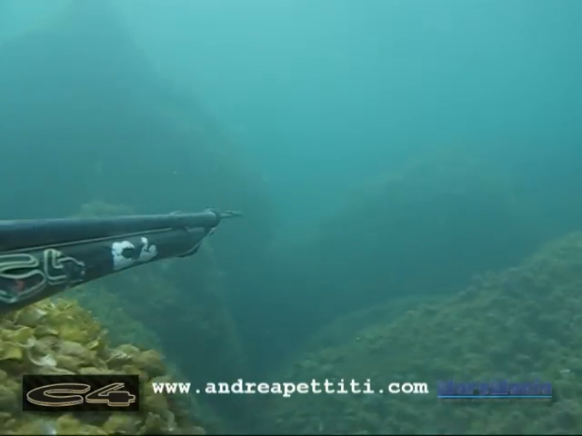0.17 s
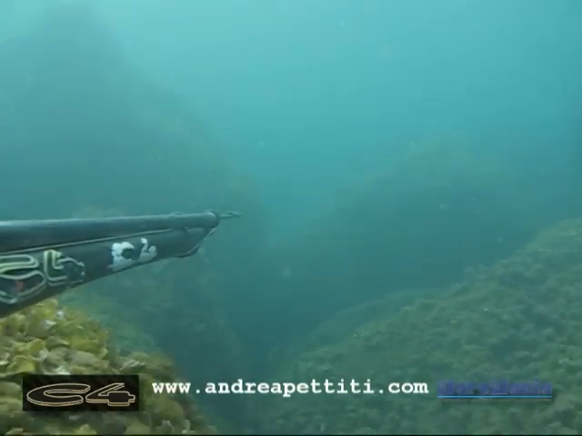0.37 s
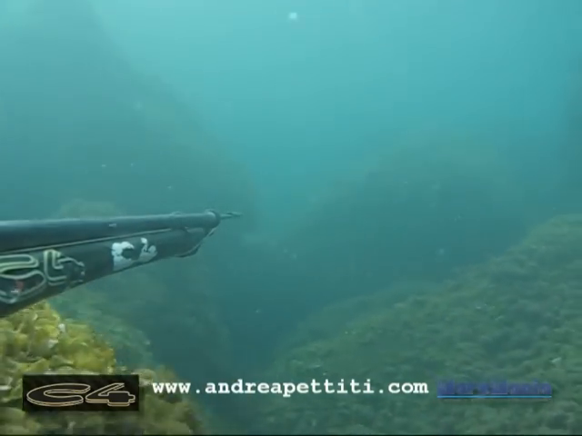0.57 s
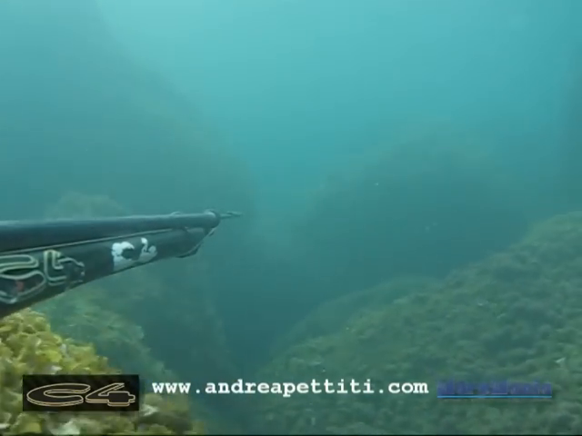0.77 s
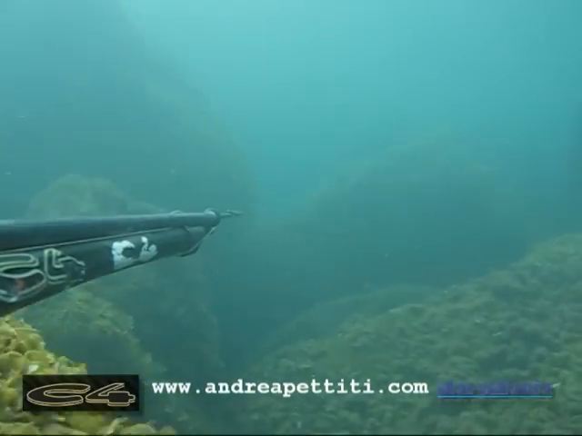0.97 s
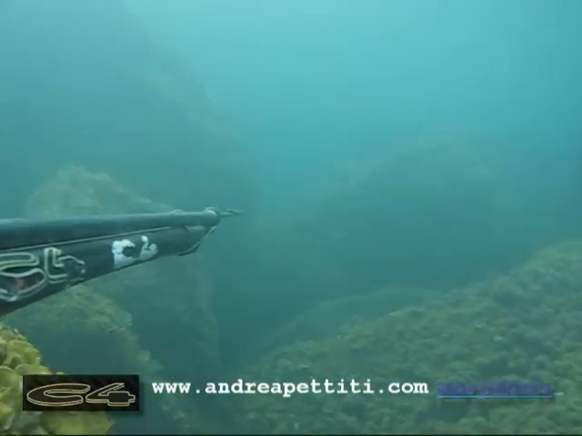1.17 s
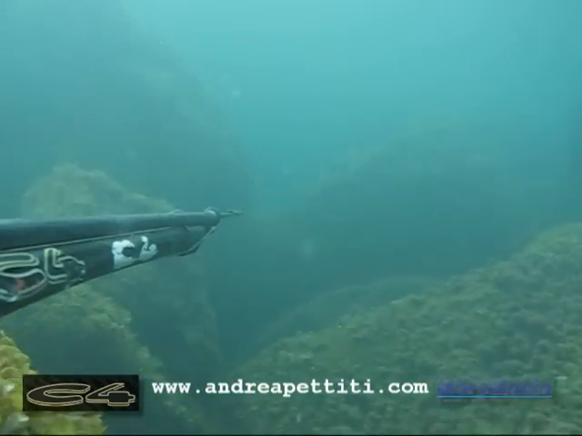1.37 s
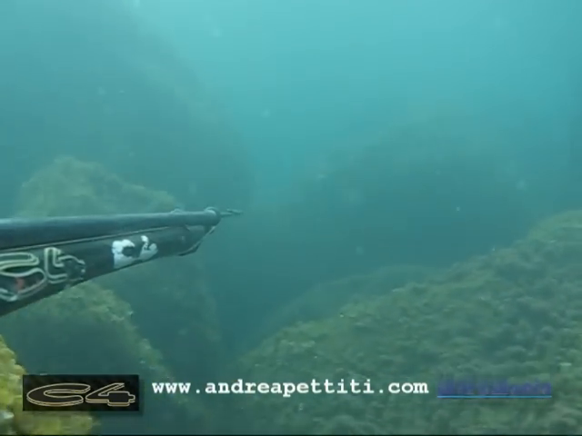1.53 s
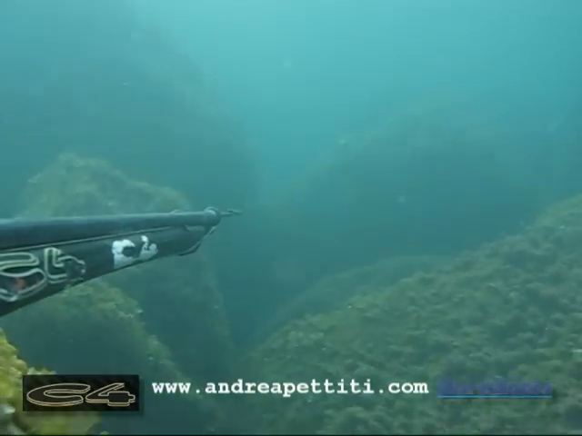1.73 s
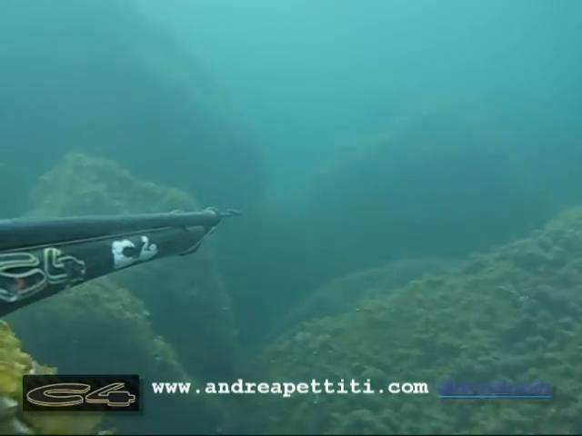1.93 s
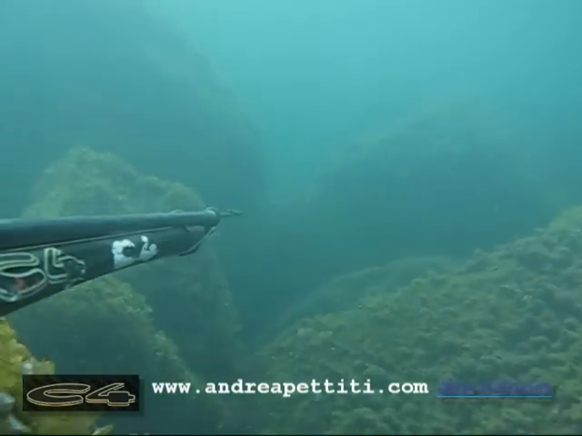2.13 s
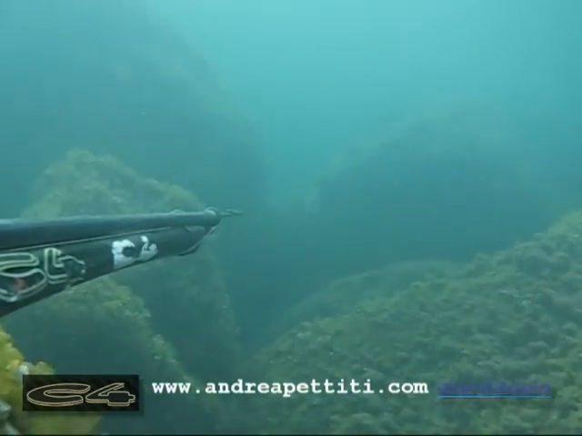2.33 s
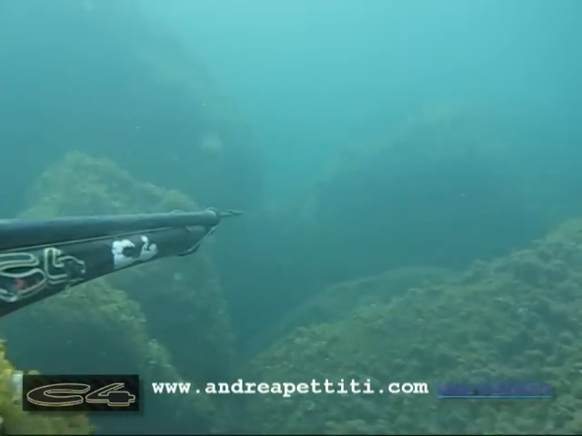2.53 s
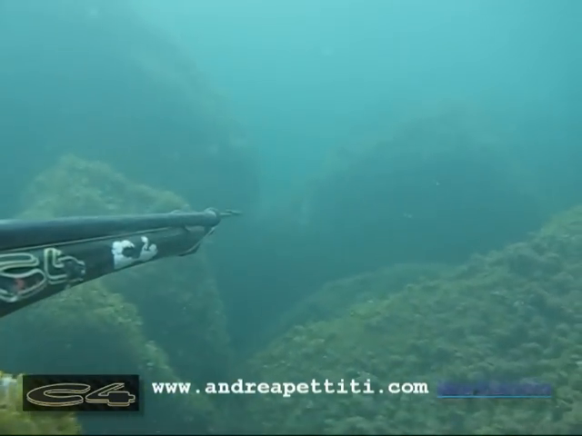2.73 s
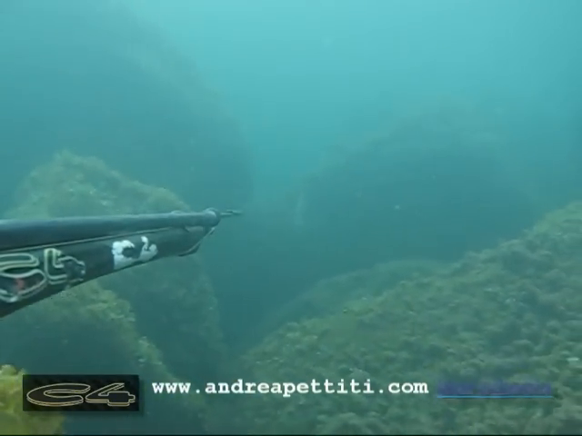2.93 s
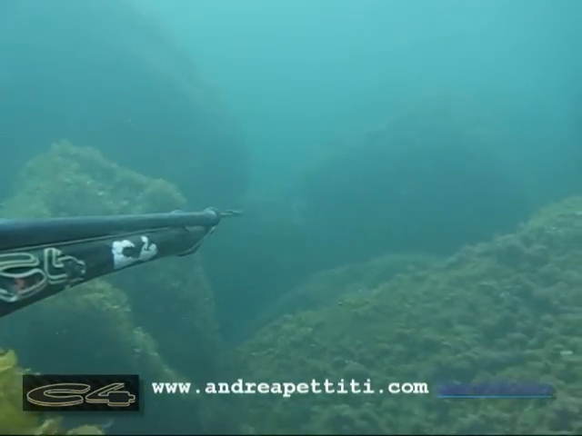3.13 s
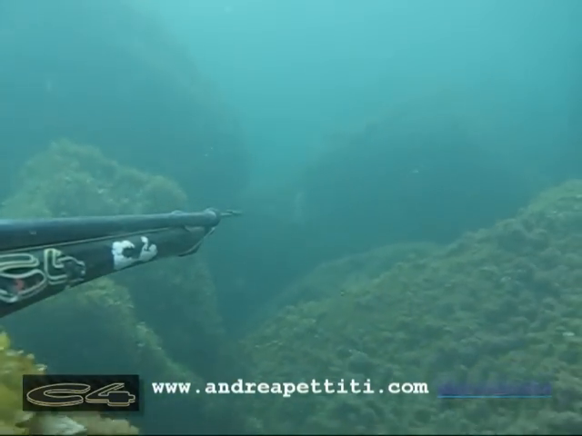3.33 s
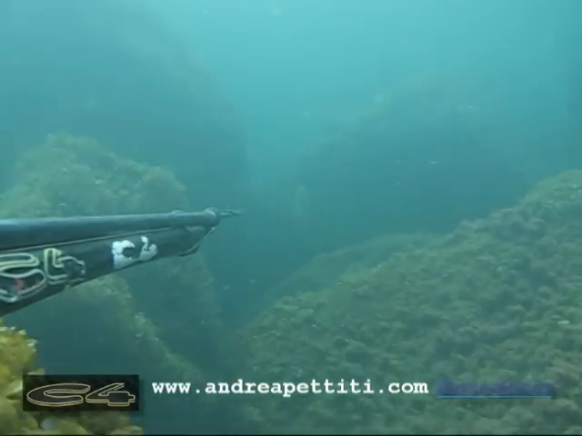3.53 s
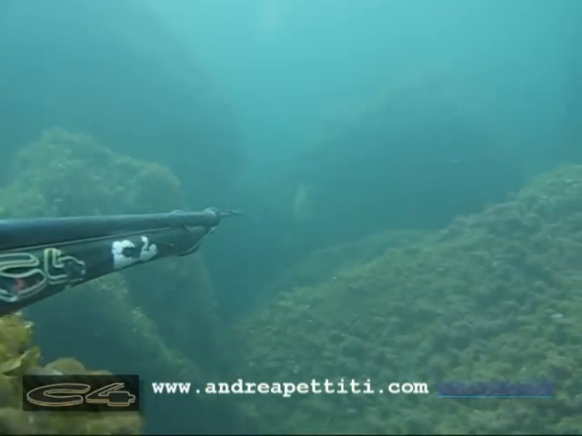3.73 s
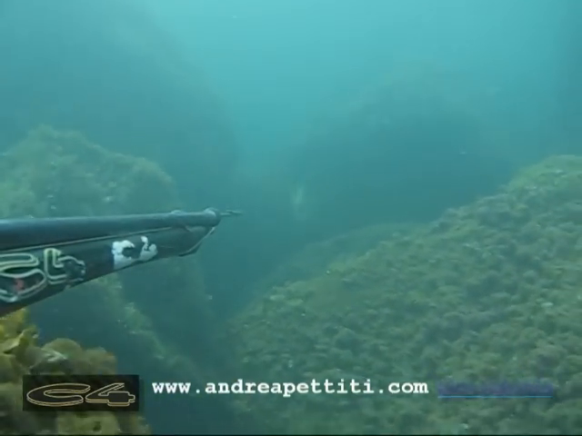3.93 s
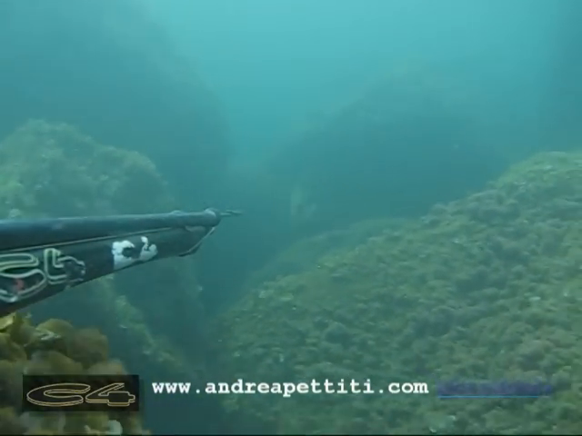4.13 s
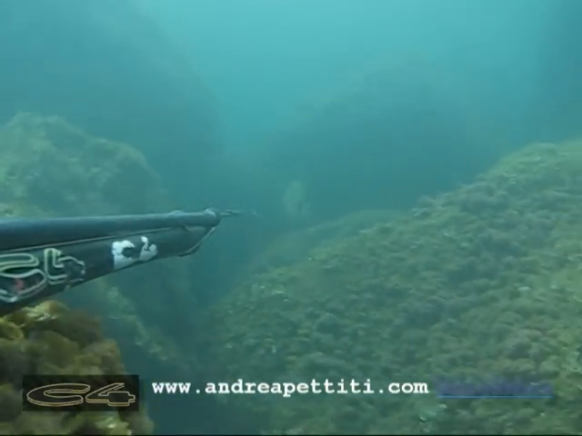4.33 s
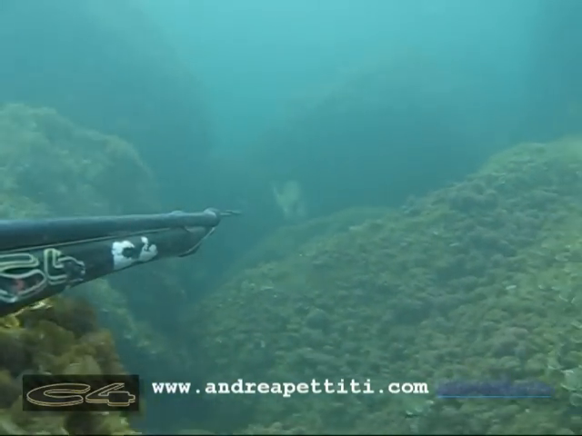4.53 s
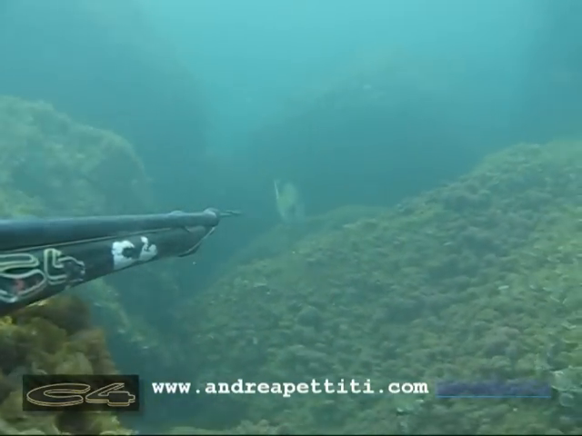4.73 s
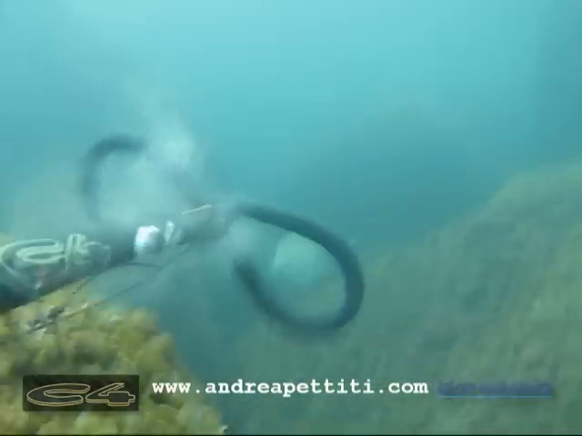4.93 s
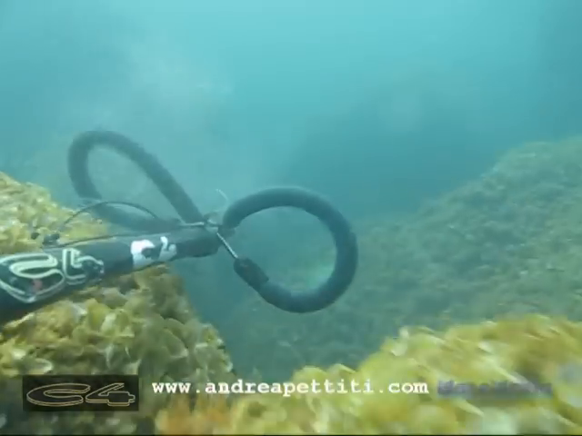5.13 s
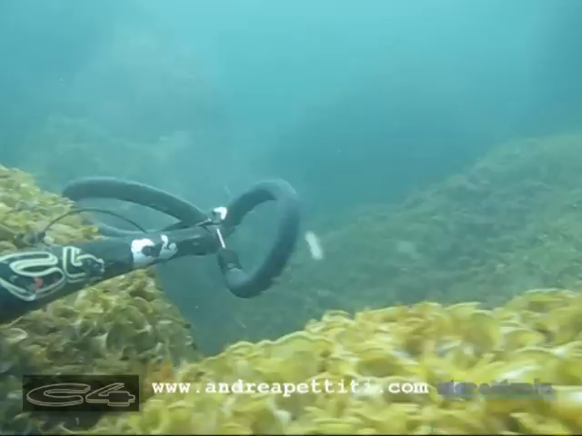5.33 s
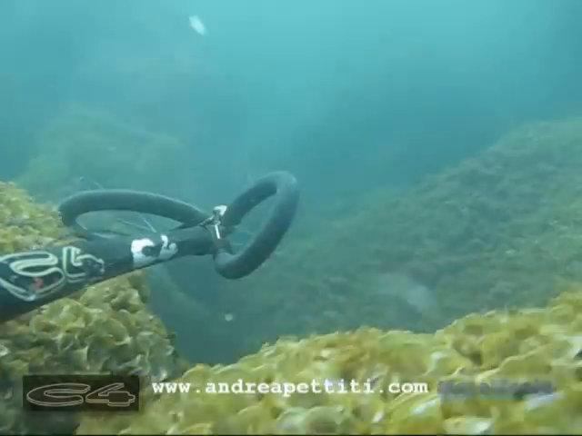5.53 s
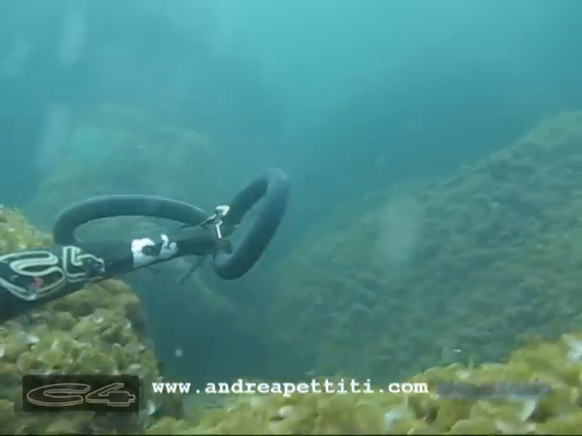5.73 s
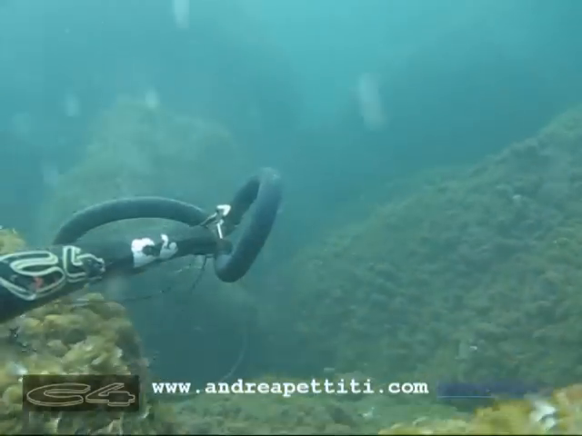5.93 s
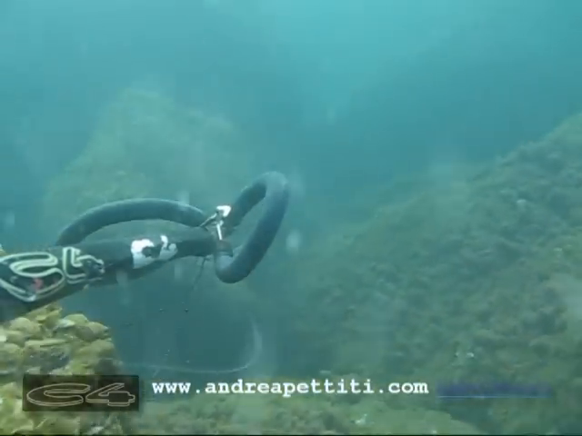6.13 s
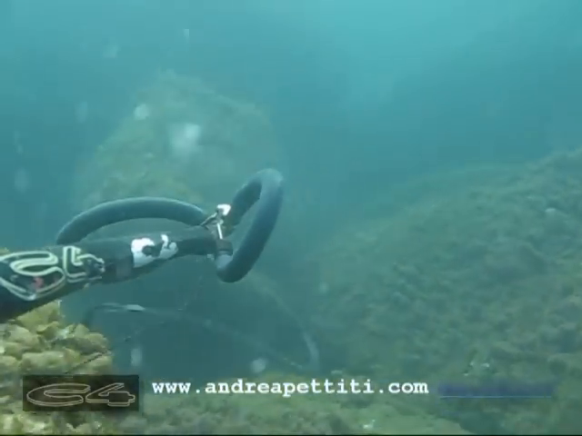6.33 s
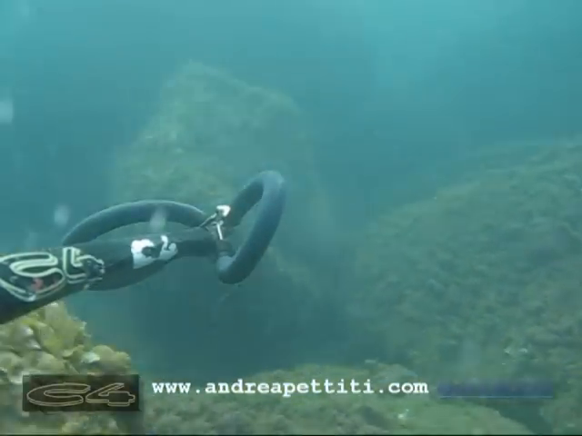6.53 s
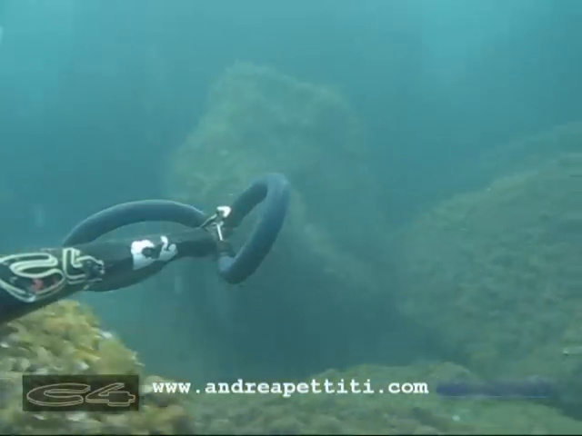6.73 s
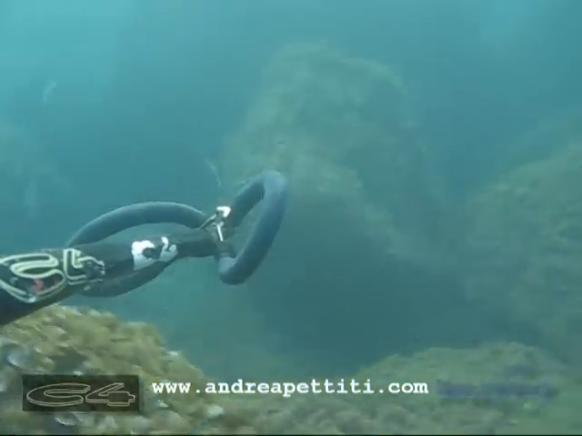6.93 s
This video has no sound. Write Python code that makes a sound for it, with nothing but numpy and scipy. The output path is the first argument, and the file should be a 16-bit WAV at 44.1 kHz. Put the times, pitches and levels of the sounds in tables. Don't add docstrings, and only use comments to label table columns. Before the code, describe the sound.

Underwater among crackling shrimp, a grip taps and groans, then a speargun fires with an overloaded crack, followed by hard knocks, scrapes and rumble.

```python
import sys
import numpy as np
from scipy import signal
from scipy.fft import rfft, irfft
from scipy.io import wavfile
from scipy.ndimage import uniform_filter1d

SR = 44100
rng = np.random.default_rng(int(sys.argv[2]) if len(sys.argv) > 2 else 0)


def persist_wave(psi):
    counts = np.round(np.clip(psi, -1, 1) * 32767).astype(np.int16)
    wavfile.write(sys.argv[1], SR, np.atleast_2d(counts).T)


def decibels_to_gain(level_db):
    exponent = np.asarray(level_db, float) / 20
    return 10 ** exponent


N = 312669

# time in seconds, level in dB.
RUB = [(0.0, -59), (0.41, -55), (1.2, -61), (1.3, -60), (1.83, -58), (2.03, -55), (2.88, -60.5),
       (4.74, -60), (5.03, -56), (5.23, -54.5), (5.35, -47), (5.51, -55.5), (5.73, -51), (6.16, -56.5),
       (6.44, -57), (6.65, -58), (6.79, -43), (7.09, -63)]
# frequency in Hz, width in Hz, level in dB.
HOUSING = [(294, 159, 5.5), (413, 127, 4), (513.2, 27.3, -1.5), (861, 59, -10.5), (1016, 43, -11)]
# start in seconds, peak in dB.
TAPS = [(0.045, -48), (0.093, -39), (0.138, -32.5), (0.194, -33), (0.246, -32), (0.296, -35), (0.34, -37.5),
        (0.389, -36), (0.442, -33), (0.492, -33.5), (0.686, -50), (.735, -41.5), (.783, -44), (.83, -46.5),
        (.882, -42)]


def rms_one(x):
    return x / np.sqrt(np.mean(x ** 2) + 1e-20)


def in_time(rows):
    s, *columns = np.transpose(rows)
    return [np.interp(np.arange(N) / SR, s, c) for c in columns]


def colour(x, points):
    hz = np.maximum(np.arange(513) * SR / 1024, 20)
    point_hz, point_db = np.transpose(points)
    gain = decibels_to_gain(np.interp(np.log(hz), np.log(point_hz), point_db))
    cep = irfft(np.log(gain + 1e-5))
    cep[1:512] *= 2
    cep[513:] = 0
    return signal.fftconvolve(x, irfft(np.exp(rfft(cep))))[:len(x)]


def band(x, lo_hz, hi_hz):
    return signal.sosfilt(signal.butter(2, [lo_hz, hi_hz], "band", fs=SR, output="sos"), x)


def resonance(x, hz, width_hz):
    r = np.exp(-np.pi * width_hz / SR)
    poles = [1, -2 * r * np.cos(2 * np.pi * hz / SR), r * r]
    return signal.lfilter([(1 - r * r) / 2, 0, (r * r - 1) / 2], poles, x)


def ring(hz, t60_s, rise_s, size, glide=0):
    glide_s = 0.021
    t = np.arange(size) / SR
    turns = hz * (t - glide * glide_s * (1 - np.exp(-t / glide_s)))
    return np.sin(2 * np.pi * turns) * decibels_to_gain(-60 * t / t60_s) * (1 - np.exp(-t / rise_s))


def add(out, s, sound):
    i = int(s * SR)
    out[i:i + len(sound)] += sound[:N - i]


def grains(per_s, spread_db):
    size = decibels_to_gain(spread_db * np.minimum(rng.exponential(1, N), 5))
    return (rng.random(N) < per_s / SR) * size * rng.choice([-1, 1], N)


def swells(rows, column=None):
    t, out = np.arange(N) / SR, 0
    for row in rows:
        s, db, rise_s, fall_s = row[:4]
        trim_db = row[column] if column else 0
        away = np.where(t < s, (s - t) / max(rise_s, .005), (t - s) / max(fall_s, .005))
        fade_db = 20 * np.minimum(away + np.maximum(away - 1, 0) ** 2, 9)
        out = out + decibels_to_gain(db + trim_db - fade_db)
    return out


def drift(lo_hz, hi_hz):
    return rms_one(band(rng.standard_normal(N + SR), lo_hz, hi_hz)[SR:])


def gain_db():
    since_s = np.arange(N) / SR - 4.95
    return -10.5 * (since_s > 0) * np.exp(-np.abs(since_s) / 0.36)


def whine():
    # frequency in Hz, level in dB rms.
    tones = [(3403, -62.5), (5814, -83.5), (6654, -92), (6874, -86.5), (7623, -86)]
    t = np.arange(N) / SR
    flutter = 1 + 0.15 * rms_one(band(rng.standard_normal(N), 3.2, 24))
    return flutter * sum(np.sqrt(2) * decibels_to_gain(db) * np.sin(2 * np.pi * hz * t) for hz, db in tones)


def reef():
    # frequency in Hz, level in dB per Hz.
    reef_colour = [(350, -45.5), (600, -7), (1500, -7), (2300, -4.5), (3300, -11), (4300, -10),
                   (5500, -18.5), (7600, -27), (9300, -28)]
    level_db, drift_db, echo_t60_s = -52, 0.57, 0.051
    far = rms_one(grains(2500, spread_db=1.0))
    born, region = grains(70, spread_db=1.35), rng.integers(0, 8, N)
    white = rng.standard_normal(N)
    r = np.exp(-np.log(1000) / (echo_t60_s * SR))
    near = 0
    for k, hz in enumerate(np.geomspace(1200, 7500, 8)):
        puffs = signal.lfilter([1], [1, -r], np.abs(born) * (region == k) + 1e-18)
        near = near + resonance(white * puffs, hz, 0.61 * hz)
    crackle = rms_one(colour(far + 0.68 * rms_one(near), reef_colour))
    return decibels_to_gain(level_db + drift_db * drift(0.75, 2.27)) * crackle


def sway():
    # time in seconds, level in dB.
    sway_curve = [
        [(0.0, -48.5), (0.08, -32.5), (1.62, -39.5), (2.97, -34), (3.15, -48), (3.18, -35), (3.6, -41),
         (4.75, -31.5), (4.8, -22)],
        [(4.97, -26), (6.22, -36), (6.28, -48.5), (6.37, -23.5), (6.5, -50), (6.56, -29.5), (6.67, -38.5),
         (6.94, -22.5), (7.09, -37)],
    ]
    # peak in seconds, level in dB, rise in s, fall in s, boom in dB.
    jolts = [(1.98, -57, 0.041, 0.041, 16), (4.79, -51, 0.033, 0.033, 7), (5.0, -32, 0.12, 0.059, 6.5),
             (5.23, -37, 0.12, .1, 7), (5.36, -37, 0.072, 0.15, 13), (5.52, -36.5, 0.056, 0.11, 8.5),
             (5.68, -44, 0.06, .15, 0), (5.89, -43.5, 0.069, 0.25, 3), (6.18, -45.5, 0.12, 0.14, 3),
             (6.355, -37, 0.07, 0.11, 1), (6.7, -35, 0.085, .12, -15), (6.855, -32, 0.13, 0.16, 3.5)]
    shake_db, lurch_db = -2, 3
    sway_db, rub_db = in_time(sway_curve[0] + sway_curve[1])[0], in_time(RUB)[0]
    t = np.arange(N) / SR
    stunned = decibels_to_gain(-14 * uniform_filter1d(1. * (t > 4.815) * (t < 4.96), size=800))
    boom = rms_one(resonance(resonance(rng.standard_normal(N), 53.6, 13), 53.6, 40))
    white = rng.standard_normal((3, N))
    hz = 20.5 * (1 + 0.149 * np.tanh(rms_one(band(white[0], 0.51, 4.66))))
    shake_gain = np.sqrt(2) * decibels_to_gain(sway_db + shake_db + lurch_db * drift(1.43, 8.2))
    shake = shake_gain * np.sin(2 * np.pi * np.cumsum(hz) / SR)
    thud = rms_one(band(band(white[1], 23.8, 46.3), 22, 56))
    drum = rms_one(band(white[2], 86.0, 116.0))
    thud_db = -43.5 + 0.9 * (sway_db - sway_db.mean())
    drum_db = -61 + 1.1 * (rub_db - rub_db.mean()) + lurch_db * drift(3.4, 6.4)
    drumming = (decibels_to_gain(drum_db) + swells(jolts)) * drum + swells(jolts, column=4) * boom
    return stunned * (shake + decibels_to_gain(thud_db) * thud) + drumming


def rub():
    # peak in seconds, level in dB, rise in s, fall in s, body mode in dB.
    groans = [(1.458, -47, 0.17, 0.19, -7), (1.978, -37.5, 0.14, 0.1, -11), (2.18, -43, 0.027, 0.094, -2),
              (2.3, -46, 0.032, 0.14, -6), (4.2, -50, 0.39, 0.36, -20), (4.68, -51.5, .1, 0.073, 3),
              (4.8, -34, 0.029, 0.025, -3), (5.0, -41, 0.05, 0.03, -8.5), (5.208, -36, 0.033, 0.028, 6.5),
              (5.4, -44, 0.51, 0.087, 4.5), (5.886, -38, 0.14, 0.11, 0), (6.096, -40, 0.09, 0.27, 2),
              (6.3, -33, 0.081, 0.15, -8), (6.62, -40, 0.012, 0.68, -22), (6.865, -36, 0.21, 0.11, 4.5)]
    # peak in seconds, level in dB, rise in s, fall in s.
    scrapes = [
        (5.0, -44.5, 0.074, 0.073),
        (5.898, -42.5, 0.14, 0.075),
        (6.178, -43, 0.19, 0.022),
        (6.3, -30.5, 0.064, 0.076),
        (6.69, -37, 0.11, 0.32),
    ]
    low_db, = in_time(RUB)
    touch = grains(1600, spread_db=3.0) + 0.18 * rng.standard_normal(N)
    modes = []
    for hz, width_hz, db in HOUSING:
        broad_hz = 2.58 * width_hz
        modes.append(decibels_to_gain(db) * rms_one(resonance(resonance(touch, hz, broad_hz), hz, broad_hz)))
    groan = rms_one(resonance(resonance(grains(900, spread_db=1.5), 494, 100), 494, 100))
    body = rms_one(resonance(resonance(grains(600, spread_db=4.5), 290, 150), 290, 150))
    wall_gain = decibels_to_gain(-77 + 0.6 * (low_db - low_db.mean())) + swells(scrapes)
    walls = wall_gain * (modes[3] - modes[4])
    murmur = 0.81 * rms_one(band(touch, 116.5, 258))
    rubbing = decibels_to_gain(low_db) * (murmur + modes[0] - modes[1] + modes[2])
    return rubbing - walls + decibels_to_gain(-6.0) * (swells(groans) * groan + swells(groans, column=4) * body)


def swish():
    # peak in seconds, level in dB, rise in s, fall in s.
    washes = [
        (1.85, -48, 0.074, 0.82),
        (2.06, -45, 0.012, 0.015),
        (5.31, -46, 0.077, 0.12),
        (6.314, -36, 0.078, 0.036),
        (6.6, -45.5, 0.031, 0.36),
        (6.776, -42.5, 0.22, 0.089),
    ]
    fizz = grains(9000, spread_db=2.2)
    wash = rms_one(band(band(fizz, 900, 2940), 700, 4300) + 1.8 * resonance(fizz, 2180, 330))
    return decibels_to_gain(-1.5) * swells(washes) * wash


def hum():
    # peak in seconds, level in dB, rise in s, fall in s.
    line_swell = [
        (5.2, -55, .25, 1.6),
    ]
    return swells(line_swell) * rms_one(resonance(rng.standard_normal(N), 640, 7.0))


def squeaks():
    # start in seconds, length in s, level in dB, frequency in Hz, end pitch ratio.
    stick_slips = [(1.799, 0.25, -51, 1550, 0.91), (1.9, .04, -47.5, 1120, 1.03),
                   (1.92, 0.11, -39.5, 504.4, 0.95), (1.954, 0.04, -37, 417, 1.03),
                   (2.16, 0.063, -38, 544.5, 0.86), (2.285, 0.036, -47, 488, 0.93),
                   (2.191, 0.032, -53, 1047, 1.0), (2.294, 0.033, -56, 1044, 1.06),
                   (4.785, 0.037, -41, 522, 1.0), (4.995, 0.043, -39.5, 500, 1.0),
                   (5.0, 0.038, -45.5, 1019, 0.996), (4.797, 0.035, -33.5, 280, 0.95),
                   (6.079, 0.11, -40.5, 299.7, 1.02), (6.201, 0.11, -41.5, 298, 0.94),
                   (6.28, 0.065, -43, 1055, 1.12), (6.29, 0.06, -38.5, 520, 1),
                   (6.62, 0.045, -40.5, 810, 1.13), (6.66, 0.096, -40.5, 835, .93),
                   (6.62, .14, -48, 2120, 0.99), (6.651, 0.026, -40.5, 1250, 0.91),
                   (6.74, 0.028, -46, 1043, 0.9), (6.77, 0.051, -43, 1000, 0.99),
                   (6.8, 0.091, -39.5, 497.6, 1), (2.0, 0.057, -43, 310.5, 1.02), (2.0, .08, -45, 170, 1.0),
                   (5.622, 0.082, -41, 309.4, 1.02), (6.33, 0.031, -35.5, 500, 1.01),
                   (6.7, 0.11, -41, 522, 1.08), (6.86, 0.051, -38, 509, 0.97),
                   (5.329, 0.023, -42, 1038, 0.95), (1.099, 0.079, -49.5, 401, 0.93)]
    chance = rng.standard_normal((len(stick_slips), 2, 14000))
    out = np.zeros(N)
    for (s, length_s, db, hz, ratio), d in zip(stick_slips, chance):
        u = np.linspace(0, 1, int(length_s * SR))
        wobble, throb = (rms_one(band(v, 19.4, 120))[2000:2000 + len(u)] for v in d)
        tone = np.sin(2 * np.pi * np.cumsum(hz * (ratio ** u + 0.017 * wobble)) / SR)
        add(out, s, decibels_to_gain(db) * np.sin(np.pi * u) ** 0.78 * (1 + 0.37 * throb) * tone)
    return out


def slips():
    from_hz, to_hz, length_s, lead_s, level_db = 2900, 956, 0.012, 0.008, -6.5
    out, u = np.zeros(N), np.linspace(0, 1, int(length_s * SR))
    for (s, db), d in zip(TAPS, rng.standard_normal((len(TAPS), 2000))):
        hz = from_hz * (1 + 0.075 * d[0]) * (to_hz / from_hz) ** u
        fall = np.sin(2 * np.pi * np.cumsum(hz) / SR)
        grit = rms_one(band(d, 54, 840))[-len(u):]
        add(out, s - lead_s, decibels_to_gain(db + level_db) * np.sin(np.pi * u) * (0.36 + grit) * fall)
    return out


def knocks():
    # start in seconds, peak in dB, upper mode in dB, t60 in s.
    hard_hits = [(2.166, -45, -29, 0.11), (4.035, -34.5, -29, 0.033), (4.965, -40.5, 10, 0.055),
                 (4.988, -40, 8, 0.059), (5.036, -17.5, -27, 0.03), (5.081, -49.5, 7, 0.065),
                 (5.162, -32, -3, 0.035), (5.197, -21, -14, 0.032), (5.211, -25, -30, 0.027),
                 (5.291, -27.5, -20.5, 0.038), (5.346, -31, -3, 0.053), (5.464, -22, -22, 0.029),
                 (5.491, -13.5, -10, 0.04), (5.656, -25, -13, 0.043), (5.684, -35, -12, 0.037),
                 (6.043, -34.5, -24, 0.033), (6.587, -31, -15, 0.031)]
    tap_upper_db, tap_t60_s, tap_sharp, grit_db = -21, 0.072, 1.03, -27
    body_hz, _, air_hz, wall_hz, upper_hz = [row[0] for row in HOUSING]
    out, t = np.zeros(N), np.arange(6000) / SR
    hits = [(s, db, tap_upper_db, tap_t60_s, tap_sharp) for s, db in TAPS]
    hits += [(*row, 1) for row in hard_hits]
    for (s, db, upper_db, t60_s, sharp), d in zip(hits, rng.normal(0, 1, (len(hits), 6000))):
        air = ring(sharp * air_hz * (1.04 + 0.019 * d[0]), 1.57 * t60_s, 0.0019, size=6000, glide=0.079)
        air = air * decibels_to_gain(-60 * (t / (1.01 * t60_s)) ** 2)
        air = air + 0.28 * ring(body_hz, 0.042, 0.0014, size=6000)
        air = air - 0.31 * ring(364, 0.023, 0.00061, size=6000)
        wall = ring(upper_hz * (1 + 0.032 * d[1]), 0.065, 0.002, size=6000) * decibels_to_gain(-60 * (t / .04) ** 2)
        wall = wall + 0.68 * ring(wall_hz * (1 + 0.058 * d[2]), 0.038, 0.00039, size=6000)
        grit = band(d * decibels_to_gain(-60 * t / 0.017), 1900, 2700)
        add(out, s, decibels_to_gain(db + 2.5) * (air + decibels_to_gain(upper_db) * (wall + 0.62 * grit) + decibels_to_gain(grit_db) * grit))
    return out


def bumps():
    # start in seconds, peak in dB.
    body_bumps = [(0.213, -30.5), (0.564, -37), (0.6, -37), (0.803, -38.5), (0.96, -44), (1.102, -37),
                  (2.03, -47), (2.573, -33.5), (5.243, -51), (5.354, -53), (6.349, -43)]
    bump_hz, thump_hz = 185.4, 98
    bump = ring(bump_hz, 0.042, 0.00072, size=8000) - 0.54 * ring(0.74 * bump_hz, 0.049, 0.0024, size=8000)
    bump = bump + decibels_to_gain(-4) * ring(thump_hz, 0.11, 0.0031, size=8000)
    out = np.zeros(N)
    for s, db in body_bumps:
        add(out, s, decibels_to_gain(db + 5.5) * bump)
    return out


def snaps(rows, broad, width):
    collapse_s, click_weight, echo_per_s, top_hz = 0.000897, 2.76, 24.4, 5200
    out, t = np.zeros(N), np.arange(3000) / SR
    for (s, db, hz, t60_s), noise in zip(rows, rng.standard_normal((len(rows), 3000))):
        front = decibels_to_gain(-60 * t / 0.0053)
        echo = min(echo_per_s * t60_s, 1) * decibels_to_gain(-60 * t / np.clip(t60_s, .004, .1))
        puff = noise * (front + echo) * (1 - np.exp(-(t / 0.0007) ** 2))
        puff[int(collapse_s * SR)] += click_weight * np.sign(noise[0])
        body = resonance(puff, hz, width * hz) + broad * 0.4 * band(puff, 1240, 3670)
        body = body + 0.1 * band(puff, 600, 1400) + 0.072 * band(puff, 3190, 4240)
        body = band(body, 250, max(top_hz, 1.6 * hz)) + 0.052 * band(puff, 6500, 9000)
        add(out, s, decibels_to_gain(db - 7.0) * body / np.abs(body).max())
    return out


def thin_snaps():
    # start in seconds, peak in dB, centre in Hz, t60 in s.
    thin_rows = [(.105, -28, 2300, 0.076), (.217, -28, 1900, .03), (.36, -33, 2100, .03),
                 (.9953, -24, 3800, 0.022), (1.04, -35, 2200, 0.046), (1.124, -33, 4300, .03),
                 (1.167, -24, 4300, 0.075), (1.24, -31, 2000, 0.047), (1.805, -34.5, 4000, .04),
                 (1.897, -36, 5000, .02), (1.92, -33, 5000, 0.028), (1.959, -27.5, 4270, .05),
                 (2.104, -31.5, 4200, .05), (4.965, -26, 2400, .03), (4.975, -29, 2050, .06),
                 (4.992, -33, 2300, .05), (5.04, -22, 2050, 0.046), (5.081, -33.5, 2300, .04),
                 (5.158, -33, 2200, 0.036), (5.196, -24.5, 2100, 0.024), (5.284, -32, 2080, .05),
                 (5.318, -28, 2600, .05), (5.452, -31, 2600, .03), (5.4895, -22.5, 1340, 0.018),
                 (5.708, -31, 2380, 0.027), (5.73, -32, 2150, 0.043), (5.887, -28.5, 2100, .03),
                 (6.745, -25.5, 2700, 0.053), (6.845, -27, 2300, .03), (5.0362, -16, 630, 0.01),
                 (5.369, -27, 5500, .025), (6.47, -30, 2400, 0.033), (6.495, -32, 2300, .03),
                 (1.45, -37.5, 5500, 0.073)]
    return snaps(thin_rows, broad=0.23, width=0.27)


def near_snaps():
    # start in seconds,
    # peak in dB, centre in Hz, t60 in s.
    snap_rows = [(0.134, -23, 2060, 0.038), (0.2594, -9.5, 2170, 0.027), (0.5186, -15.5, 2160, 0.069),
                 (0.6352, -25, 2560, 0.064), (0.7205, -19, 2000, 0.028), (0.7713, -20, 1920, 0.02),
                 (0.9012, -25, 1890, 0.027), (0.936, -17, 2670, 0.037), (0.9955, -19, 2320, 0.022),
                 (1.1656, -21.5, 2090, 0.07), (1.518, -15.5, 2200, 0.03), (1.8518, -20.5, 2410, 0.024),
                 (2.0503, -22.5, 2670, 0.035), (2.1303, -22.5, 2200, 0.029), (2.1938, -26, 3440, 0.11),
                 (2.3988, -24.5, 2380, 0.061), (2.8505, -24.5, 2420, 0.031), (3.0615, -21, 4230, 0.036),
                 (3.4315, -23, 3260, 0.075), (3.4669, -25, 1320, 0.063), (3.602, -27.5, 2350, 0.07),
                 (3.6476, -27.5, 2130, 0.03), (3.7162, -9, 2640, 0.023), (3.7855, -21, 2280, 0.017),
                 (4.0612, -28.5, 3410, 0.035), (4.1503, -24.5, 1870, 0.03), (4.291, -25.5, 2420, 0.053),
                 (4.309, -23, 2150, 0.11), (4.6218, -23.5, 2270, 0.08), (4.797, -29, 2080, 0.062),
                 (4.8458, -22, 2650, 0.015), (4.8614, -22, 1310, 0.013), (4.946, -18, 2440, 0.042),
                 (5.02, -19, 2650, 0.0138), (5.0366, -25.5, 2080, 0.053), (5.1942, -23, 2120, 0.019),
                 (5.343, -29, 2100, 0.026), (5.3681, -15.5, 3400, 0.028), (5.46, -28, 2540, 0.058),
                 (5.5664, -23, 2270, 0.088), (5.904, -18, 2320, 0.054), (5.972, -28, 4140, 0.03),
                 (6.043, -29, 2130, 0.026), (6.0655, -16.5, 2520, 0.035), (6.267, -20, 2090, 0.042),
                 (6.3002, -21.5, 2090, 0.044), (6.3705, -26.5, 1340, 0.033), (6.776, -29, 2160, 0.036),
                 (7.007, -26.5, 2700, 0.088)]
    # start in seconds, peak in dB.
    faint_rows = [(0.192, -32), (0.242, -27), (0.4847, -31), (.509, -20), (0.8408, -27), (1.083, -25),
                  (1.404, -28), (1.506, -26.5), (1.5564, -24.5), (1.75, -32), (2.234, -26), (2.379, -25.5),
                  (2.631, -26), (3.3687, -29), (3.577, -34), (3.666, -25), (4.182, -33), (4.371, -27),
                  (4.594, -31), (4.703, -26.5), (6.2158, -25.5), (6.8473, -30)]
    pitch_db = rng.normal(0, 1.3, len(faint_rows))
    faint = [(s, db, 2300 * decibels_to_gain(u), 0.034) for (s, db), u in zip(faint_rows, pitch_db)]
    return snaps(snap_rows + faint, broad=0.94, width=0.1)


def cracks():
    # start in seconds, peak in dB, frequency in Hz.
    pulses = [(.7223, -26.5, 2100), (.7720, -22, 2300), (.9955, -11, 3800), (.9963, -12, 3200),
              (2.1316, -30, 2600), (2.4001, -32, 2600), (2.4001, -29, 2500), (3.0617, -29, 4600),
              (3.063, -28, 4300), (3.7166, -16, 2300), (3.7173, -10, 2800), (3.7857, -24, 3900),
              (3.7869, -23, 2200), (.2604, -22, 3000), (4.9462, -23, 2600), (4.967, -27, 2200),
              (4.981, -28, 2600), (5.9059, -22, 2500), (6.066, -19, 2700), (6.0675, -22, 2600),
              (4.8214, -14, 2700), (4.8463, -20, 2700), (4.8471, -19, 2900), (4.8623, -17, 2300),
              (4.8694, -12, 800), (4.8783, -20, 2500), (4.8803, -23, 2500), (4.883, -18, 650),
              (4.8861, -17, 900), (4.8884, -16, 800), (4.8904, -17, 700), (4.897, -20, 800),
              (4.9072, -17, 2300), (4.912, -20, 2000), (4.9165, -20, 900), (4.9245, -18, 3000),
              (4.9258, -19, 3200), (4.9485, -20, 2500)]
    out = np.zeros(N)
    for s, db, hz in pulses:
        add(out, s, decibels_to_gain(db + 4.5) * ring(hz, 6.5 / hz, 0.00012, size=600))
    return band(out, 500, 7000)


def shot():
    # start in seconds, length in s, drive in dB, share of boom 0-1.
    bursts = [(4.8207, 0.005, 8, 0.3), (4.8305, 0.0045, 3, 0.53), (4.836, 0.0026, -1, 0.3),
              (4.8405, 0.002, -3, 0.2), (4.8455, 0.0028, 2, 0.3), (4.857, 0.004, -5, 0.56),
              (4.86, 0.0115, 4, 0.62), (4.8778, .004, -9, 0.4), (4.882, .011, 6.5, 0.8),
              (4.892, .0075, -3, .5), (4.9, 0.021, -2, 0.75), (4.919, 0.009, -5, 0.37),
              (4.9332, 0.001, -12, 0), (4.94, 0.003, -10, 0.8), (4.9448, 0.0055, -4.5, 0.25),
              (4.96, 0.024, -21, 0.57), (4.975, 0.061, -27.5, 0.55), (5.034, 0.0057, -14.5, 0.56)]
    # start in seconds, peak in dB, frequency in Hz, t60 in s.
    kicks = [
        (4.8212, -0.5, 63, 0.098),
        (4.812, -17.5, 109, 0.23),
        (4.858, -20, 240, 0.12),
        (4.878, -25.5, 330, 0.097),
    ]
    # frequency in Hz, level in dB per Hz.
    shot_colour = [(300, -14), (700, 3), (1500, -9), (2500, 2), (4000, -9), (5500, -35), (7500, -22),
                   (9300, -38)]
    rail = 0.12
    rattle, recoil, white = np.zeros(N), np.zeros(N), rng.standard_normal((2, 12000))
    crack = rms_one(colour(grains(1500, spread_db=5.0)[:12000] + 0.4 * white[0], shot_colour))
    boom = rms_one(sum(decibels_to_gain(db) * resonance(white[1], hz, 1.4 * width_hz) for hz, width_hz, db in HOUSING))
    for s, length_s, db, share in bursts:
        i, n = int((s - 4.815) * SR), int(length_s * SR)
        burst = ((1 - share) * crack + share * boom)[i:i + n]
        add(rattle, s, rail * decibels_to_gain(db) * signal.windows.tukey(n, .3) * burst)
    for s, db, hz, t60_s in kicks:
        add(recoil, s, -decibels_to_gain(db) * ring(hz, t60_s, 0.00022, size=20000))
    squared = np.clip(rattle + recoil, -rail, rail) + 0.22 * np.clip(rattle, -rail, rail)
    add(squared, kicks[0][0], -decibels_to_gain(-14) * ring(75, 0.033, .0006, size=4000))
    railed = band(squared, 18, 4740) + decibels_to_gain(-13.5) * band(squared, 4700, 8500)
    railed = railed - 0.5 * resonance(railed, 1400, 500)
    return railed - 0.3 * resonance(railed, 620, 160)


def scene():
    background = decibels_to_gain(gain_db()) * (reef() + whine())
    housing = sway() + rub() + swish() + knocks() + bumps()
    line_and_grip = hum() + squeaks() + slips()
    sharp = near_snaps() + thin_snaps() + cracks()
    return (background + housing + line_and_grip + sharp + shot())[None]


def roll_off(x):
    return signal.sosfilt(signal.butter(12, 16660, fs=SR, output="sos"), x)


def record(dry):
    # frequency in Hz, level in dB.
    top_shelf = [(20, 0), (7700, -1.5), (8050, -8), (9000, -10), (9400, -21.5)]
    late_samples, late_db, between_db, grit_db = 166, -3.5, -11.5, -41
    half_rate = signal.cheby2(24, 50, 9350, fs=SR, output="sos")
    early = signal.sosfilt(half_rate, colour(dry[0], top_shelf))[None]
    early = early + decibels_to_gain(grit_db) * np.abs(band(dry, 1800, 8000)) * rng.standard_normal(dry.shape)
    late = early[:, np.maximum(np.arange(N) - late_samples, 0) // 2 * 2]
    low_mid = band(dry, 98, 520) + 0.14 * band(dry, 480, 3500)
    between = decibels_to_gain(between_db) * low_mid[:, np.maximum(np.arange(N) - late_samples // 2, 0)]
    top_cut = signal.cheby2(20, 50, 15950, fs=SR, output="sos")
    return roll_off(signal.sosfilt(top_cut, early + decibels_to_gain(late_db) * late + between))


dry = scene()
out = record(dry)
persist_wave(out)
```